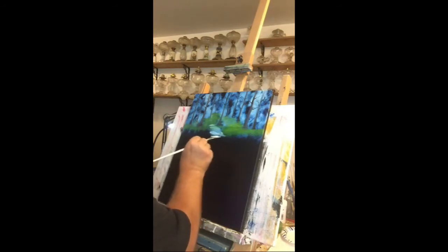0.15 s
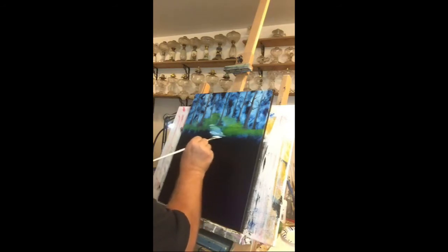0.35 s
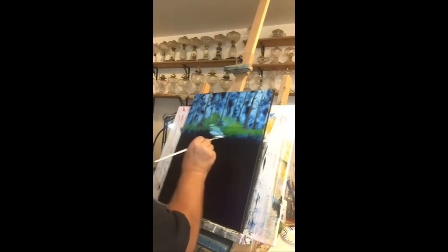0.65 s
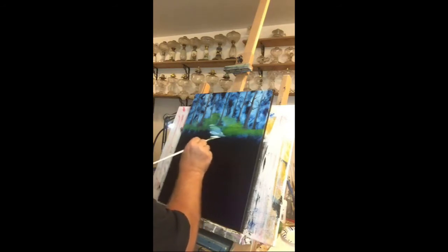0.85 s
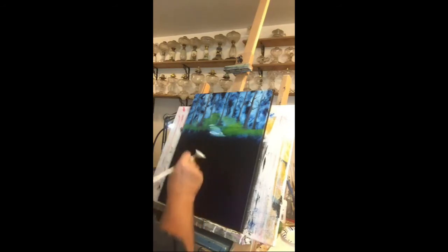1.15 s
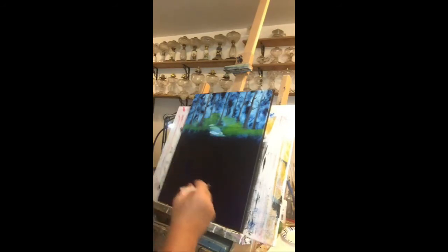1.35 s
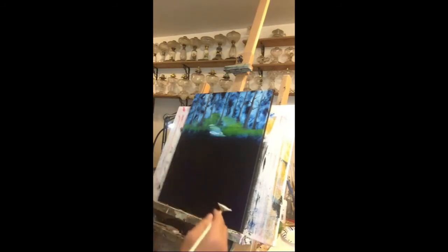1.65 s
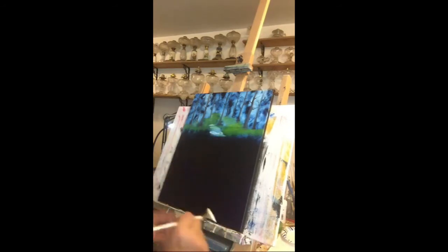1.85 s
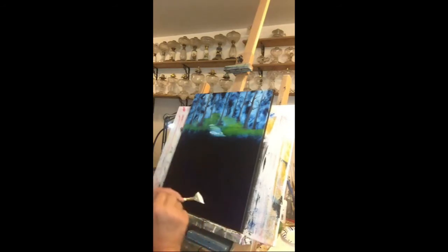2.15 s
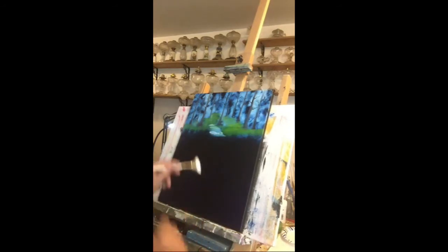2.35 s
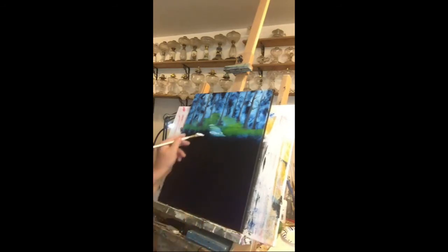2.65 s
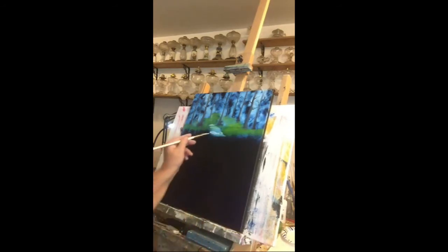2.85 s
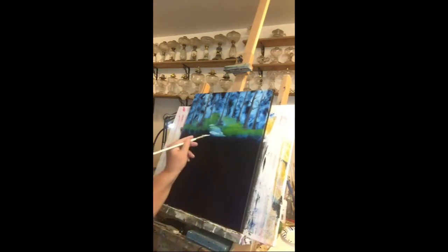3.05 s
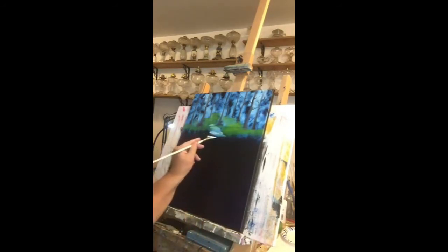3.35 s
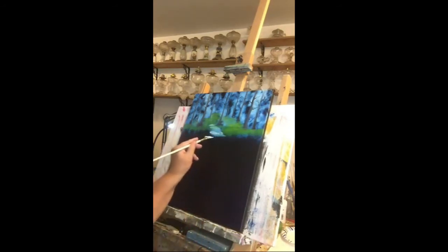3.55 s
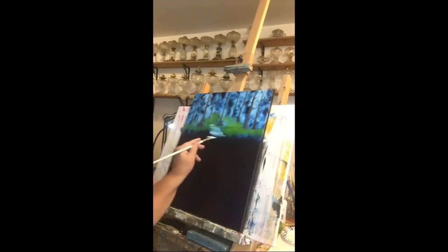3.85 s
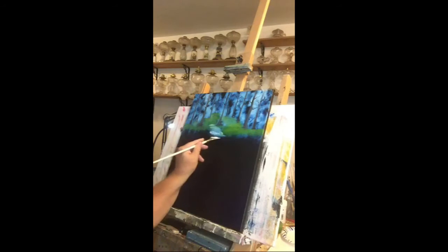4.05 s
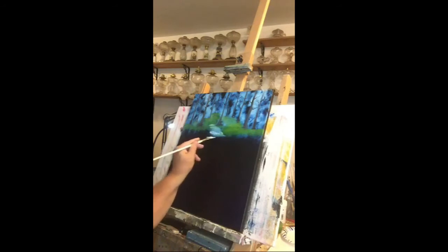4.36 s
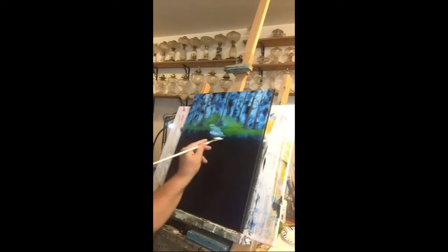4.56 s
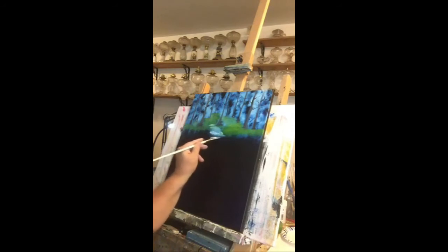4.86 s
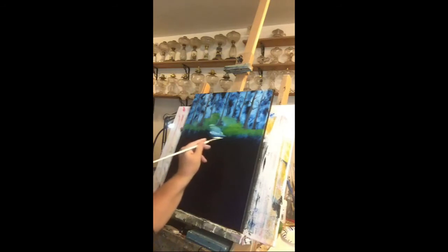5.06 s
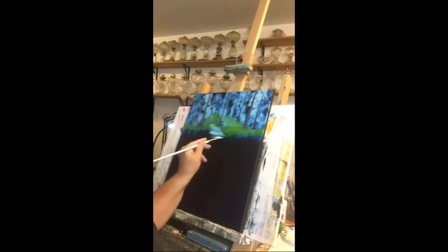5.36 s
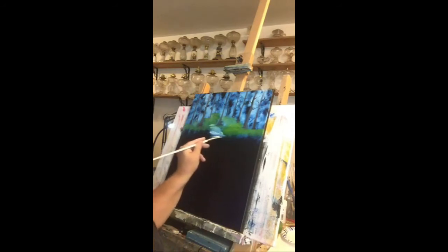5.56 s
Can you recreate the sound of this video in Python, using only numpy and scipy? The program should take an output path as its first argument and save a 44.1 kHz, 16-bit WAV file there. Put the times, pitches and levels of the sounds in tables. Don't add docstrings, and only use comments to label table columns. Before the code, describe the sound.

A close, mono, quiet pickup in a small studio. Throughout, a steady low fan hum near 120 Hz carries soft, slightly swelling air noise and faint hiss. From 0 to 0.9 s a stiff brush makes five short dry strokes on stretched canvas, roughly four per second, each a mid-high scratch with a papery, drum-like body; the fourth is strongest. At 0.94 s the handle taps the easel softly. From 1.0 to 2.4 s come very faint palette rustles, a dull tick near 1.2 s and tiny squeaks. At 2.45 s one hard wooden crack, by far the loudest event, snaps brightly with a brief metallic edge and a short room tail. Weak rustling lingers to about 3.2 s, then mostly hum. One stroke falls at 3.6 s, a faint touch at 3.9 s, and from 4.0 s to the end at 5.7 s irregular quick scrubs continue, firm ones mixed with light dabs.

```python
import sys
import numpy as np
from scipy import signal
from scipy.fft import rfft, irfft, next_fast_len
from scipy.io import wavfile
from scipy.ndimage import uniform_filter1d

SR = 44100
rng = np.random.default_rng(int(sys.argv[2]) if len(sys.argv) > 2 else 0)


def wav_record(signal):
    frames = np.transpose(np.atleast_2d(signal))
    bounded = np.clip(frames, -1, 1)
    quanta = np.round(bounded * 32767).astype(np.int16)
    wavfile.write(sys.argv[1], SR, quanta)


def elevation(decibels):
    levels = np.asarray(decibels, float)
    return 10 ** (levels / 20)


N = 251811

# landing, hardest point and lifting in
# seconds, pressure in dB, brightness in dB.
STROKES = [(-0.066, 0.006, 0.074, -51.5, -9), (0.112, 0.134, 0.23, -47.5, -11.5),
           (0.316, 0.426, 0.476, -48.5, -9.5), (0.544, 0.597, 0.681, -45, -8.5),
           (0.768, 0.807, 0.88, -49.5, -6.5), (3.58, 3.642, 3.751, -48.5, -11),
           (3.844, 3.902, 3.914, -60, -9.5), (4.025, 4.159, 4.199, -45.5, -10.5),
           (4.233, 4.282, 4.285, -68.5, -19), (4.34, 4.36, 4.391, -61, -10),
           (4.427, 4.544, 4.596, -45.5, -7.5), (4.671, 4.733, 4.78, -49, -7.5),
           (4.853, 4.969, 5.003, -46, -8), (5.049, 5.14, 5.202, -47, -7.5),
           (5.252, 5.264, 5.367, -49.5, -10), (5.401, 5.39, 5.462, -66.5, -10),
           (5.449, 5.477, 5.502, -53.5, -10), (5.525, 5.57, 5.587, -48, -10.5),
           (0.338, 0.36, 0.37, -59.5, -4),
    (0.517, 0.535, 0.53, -67, -14),
    (4.835, 4.87, 4.89, -75, -18),
    (5.03, 5.046, 5.085, -68, -22),
    (5.228, 5.26, 5.25, -57, -10),
    (5.305, 5.369, 5.376, -60.5, -5),
    (5.407, 5.44, 5.455, -65, -10),
]
# frequency in Hz, level in dB per Hz.
BRISTLE_SPECTRUM = [(1290, -16.5), (2200, -1), (2510, -3.5), (3530, -2), (4460, -6.5), (5300, -10.5),
                    (8440, -19.5), (10400, -24), (12400, -24), (16000, -30.5)]
# frequency in Hz, width in Hz, level in dB.
CANVAS_MODES = [(1324, 130, 12.5), (1600, 119, 15.5), (1994, 7.7, 5), (2270, 11, -3), (3040, 30, -3),
                (3450, 10, -5)]
LAND_S, LIFT_S, AWAY_DB = 0.029, 0.038, -45.5
LANDING_DB, LIFTING_DB = -9.5, -11
TOP_LOSS_DB_PER_DB, LANDING_LOSS_DB_PER_DB, UPPER_LOSS_DB_PER_DB = 0.067, 0.14, 0.083
SKIN_EVEN_DB, SKIN_GIVE_DB_PER_DB, SKIN_LEAD_MAX_DB = -51, 0.62, 12.5
ECHO_DB, ECHO_T60_S, ECHO_TOP_HZ = -13, 0.19, 4000

# start in seconds, length in seconds, level in dB, rubbed spot in Hz,
# spot level in dB.
RUBS = [(0.997, .05, -73, 3000, -15), (1.194, 0.23, -67, 2800, -16.5), (1.5, 0.094, -67.5, 4300, -6.5),
        (1.578, 0.29, -64.5, 3580, -9), (1.657, 0.39, -67, 4040, -6.5), (1.844, 0.41, -64, 3640, -13),
        (1.901, .42, -68.5, 3050, -6), (2.178, 0.12, -62.5, 4000, -11), (2.199, .16, -68.5, 3450, -6.5),
        (2.65, 0.14, -79, 5000, 3), (2.823, 0.2, -69.5, 3200, -16), (2.977, .25, -72, 3000, -28)]
# frequency in Hz, width in Hz, level in dB.
PALETTE_MODES = [(2070, 133, 2), (2330, 660, -8), (3050, 130, 4.5), (2800, 300, -2), (3486, 100, 0.5),
                 (4090, 50, -1), (4000, 830, 0.5), (4690, 440, 0), (5370, 900, -3), (8500, 3000, -1)]
# start in seconds, level in dB, frequency in Hz, width in Hz,
# length in seconds.
SQUEAKS = [(1.19, -48.5, 270, 121, 0.074), (1.198, -64.5, 8440, 451, 0.09), (1.223, -75, 7440, 81, 0.051),
           (1.322, -76, 2690, 101, 0.05), (1.504, -69.5, 4620, 900, .05), (1.497, -72, 6380, 101, 0.066),
           (1.83, -76.5, 7060, 301, 0.042), (1.884, -78.5, 8670, 201, 0.047), (1.955, -77, 6600, 401, 0.06),
           (1.945, -75, 8800, 601, 0.084), (2.043, -76.5, 5650, 201, .11), (2.133, -71.5, 5600, 151, 0.11),
           (2.138, -77, 5960, 101, 0.092), (2.15, -71, 14501, 1501, .08), (2.16, -79, 8501, 501, .06),
           (2.394, -68, 3060, 101, 0.043), (2.767, -76, 13100, 601, .07), (2.865, -73.5, 4601, 61, 0.033),
           (2.948, -72.5, 2980, 60.8, 0.06), (3.55, -72, 6300, 151, .055), (3.823, -73.5, 5190, 101, 0.11),
           (3.846, -78.5, 3620, 202, 0.063), (3.947, -81, 5150, 81, 0.1), (4.022, -59, 5110, 101, 0.089)]
FOCUS_DB_PER_OCTAVE, BOARD_HZ = 40, 2600

# time in seconds, peak in dB.
CRACK = [
    (2.446, -2),
]
# time in seconds, peak in dB.
TAP = [
    (0.94, -35.5),
]
# frequency in Hz, level in dB per Hz.
CRACK_SPECTRUM = [(100, -44), (150, -17.5), (198, -12.5), (642, -22), (999, -8), (1330, -4), (1440, -6),
                  (1890, -3), (2670, -9), (3000, -4.5), (4240, -2.5), (5450, -7), (12000, -19.5),
                  (12900, -21), (13700, -32), (15900, -37), (16400, -80)]
# frequency in Hz, level in dB per Hz.
TAP_SPECTRUM = [(120, -36), (200, -13.5), (658, -10.5), (1030, -9.5), (1630, -6.5), (2020, -12.5),
                (3380, -15.5), (4180, -42), (4910, -21.5), (5270, -32), (14000, -44.5)]
# frequency in Hz, level in dB, T60 in seconds.
EASEL_MODES = [(194, -10.5, 0.22), (1217, -9.5, 0.04), (1570, -2.5, 0.045), (2052, -3.5, 0.1),
               (3154, -2.5, 0.083), (3546, -2.5, 0.17), (4193, -4, 0.21), (4200, -4, 0.12),
               (5080, -22, 0.12), (5350, -11.5, 0.1413), (6070, -6.5, 0.18), (7900, -20, 0.15)]
# frequency in Hz, level in dB, T60 in seconds.
FERRULE_MODES = [(14062, -16, .16), (14812, -15, .15), (15562, -14, .15)]
# frequency in Hz, T60 in seconds.
STUDIO_T60 = [(150, 0.28), (400, 0.43), (1040, 0.2), (2760, 0.19), (7280, 0.1944)]

# frequency in Hz, level in dB per Hz.
AIR_SPECTRUM = [(30, -47), (65, -44.5), (85, -21), (150, -17), (238, -22), (395, -15.5), (450, -21.5),
                (678, -23.5), (1000, -19.5), (1350, -22), (1460, -23.5), (2080, -32), (2300, -46),
                (2600, -69.5)]
# frequency in Hz, width in Hz, level in dB.
HOUSING_MODES = [(187.8, 32, -58), (241.7, 42, -62), (301.3, 23, -65), (392.6, 28, -62.5), (646.3, 20, -63),
                 (695, 31, -60.5), (1316.5, 28, -62), (1666, 110, -72.5)]
# time in seconds, level in dB.
AIR_SWELL = [(0.0, -52), (0.32, -53), (0.54, -52.5), (1.43, -52.5), (1.94, -50), (2.51, -53), (3.05, -51),
             (3.4, -52.5), (3.66, -52), (3.78, -51.5), (4.04, -51), (4.53, -51), (4.72, -52), (5.71, -51.5)]
AIR_DB, HUM_HZ, HUM_DB = -48.5, 120.15, -48

# frequency in Hz, level in dB per Hz.
HISS_SPECTRUM = [(1500, -21.5), (2200, 1), (3300, -6), (5000, -7), (9750, -8), (12400, -5), (16000, -11)]
# frequency in Hz, level in dB per bin.
THRESHOLD = [(1900, -120), (2400, -90), (5000, -91), (9000, -96), (16000, -100)]
HISS_DB, LOW_CUT_HZ, EDGE_HZ, CEILING = -79.5, 60, 15900, 1.0


def brush():
    catch = slips(N, per_s=12000, spread_db=-1.0)
    hiss = patchy(coloured(catch, BRISTLE_SPECTRUM), depth_db=4, size=2048)
    top = high_pass(hiss, 2, 6000)
    upper = high_pass(hiss, 2, 3000)
    skin = evened(sum(elevation(db) * resonate(catch, hz, 3 * width_hz) for hz, width_hz, db in CANVAS_MODES))
    skin = patchy(skin, depth_db=2.5, size=2048)
    t, out = np.arange(N) / SR, np.zeros(N)
    uneven = wander(N, depth_db=0.8, size=250)
    for land_s, hardest_s, lift_s, db, bright_db in STROKES:
        press_db = stroke_pressure(t, land_s, hardest_s, lift_s, db)
        lightness_db = press_db - db
        dulling = TOP_LOSS_DB_PER_DB + LANDING_LOSS_DB_PER_DB * (t < hardest_s)
        tips = hiss + (elevation(bright_db + 15 + dulling * lightness_db) - 1) * top
        tips += (elevation(UPPER_LOSS_DB_PER_DB * lightness_db) - 1) * upper
        body_db = np.minimum(SKIN_GIVE_DB_PER_DB * (SKIN_EVEN_DB - press_db), SKIN_LEAD_MAX_DB)
        body = elevation(uniform_filter1d(body_db, size=300)) * skin
        pressure = uniform_filter1d(elevation(uniform_filter1d(press_db, size=500)), size=500)
        out += pressure * (uneven * tips + body)
    return out


def stroke_pressure(t, land_s, hardest_s, lift_s, db):
    times_s = np.sort([land_s - LAND_S, land_s, hardest_s, lift_s, lift_s + LIFT_S])
    levels_db = [AWAY_DB, LANDING_DB, 0, LIFTING_DB, AWAY_DB]
    return db + np.interp(t, times_s, levels_db, 2 * AWAY_DB, 2 * AWAY_DB)


def slips(count, per_s, spread_db):
    chance, sign, size = rng.random(count), rng.standard_normal(count), rng.exponential(1, count)
    return evened((chance < per_s / SR) * sign * elevation(spread_db * np.minimum(size, 4)))


def echo(x):
    t = np.arange(SR // 4) / SR
    b, a = signal.butter(2, ECHO_TOP_HZ, fs=SR)
    tail = signal.lfilter(b, a, rng.standard_normal(len(t))) * elevation(-60 * t / ECHO_T60_S)
    return elevation(ECHO_DB) * signal.oaconvolve(x, tail / np.linalg.norm(tail))[:len(x)]


def knock(db, spectrum, ring_db, pace, rise_s):
    t = np.arange(SR // 2) / SR
    burst = coloured(slips(len(t), per_s=18000, spread_db=1), spectrum)
    hz, frame_s, z = signal.stft(burst, SR, nperseg=128)
    decay = elevation(-60 * frame_s / (pace * read(STUDIO_T60, hz)[:, None]))
    tail = signal.istft(z * decay, SR, nperseg=128)[1][:len(t)]
    tail += elevation(-35.5 - 60 * t / 0.62) * burst
    rings = np.zeros(len(t))
    for mode_hz, mode_db, t60_s in EASEL_MODES + FERRULE_MODES:
        phase = 2 * np.pi * rng.random()
        rings += elevation(mode_db - 60 * t / (pace * t60_s)) * np.sin(2 * np.pi * mode_hz * t + phase)
    blow = elevation(db) * (tail + elevation(ring_db) * rings) * np.minimum(t / rise_s, 1) ** 2
    return high_pass(blow, 4, 130)


def rustle():
    out = np.zeros(N)
    for s, length_s, level_db, spot_hz, spot_db in RUBS:
        count = round(length_s * SR)
        for hz, width_hz, db in PALETTE_MODES:
            near_db = (hz > BOARD_HZ) * (spot_db - FOCUS_DB_PER_OCTAVE * abs(np.log2(hz / spot_hz)))
            contact = wander(SR // 2, depth_db=3, size=1000)
            rub = contact * resonate(slips(SR // 2, per_s=1500, spread_db=-1.5), hz, width_hz)
            add(out, s, elevation(level_db + db + near_db) * rub[:count] * signal.windows.tukey(count, 0.6))
    return out


def squeaks():
    out = np.zeros(N)
    for s, db, hz, width_hz, length_s in SQUEAKS:
        puff = resonate(rng.standard_normal(5000), hz, width_hz)[:round(length_s * SR)]
        add(out, s, elevation(db) * puff * np.hanning(len(puff)))
    return out


def fan():
    t = np.arange(N) / SR
    hum = np.sqrt(2) * elevation(HUM_DB) * wander(N, depth_db=0.07, size=4000) * np.sin(2 * np.pi * HUM_HZ * t)
    air = elevation(AIR_DB - 4.5) * patchy(coloured(rng.standard_normal(N), AIR_SPECTRUM), depth_db=2.5, size=2048)
    for hz, width_hz, db in HOUSING_MODES:
        ringing = resonate(rng.standard_normal(N), hz, width_hz)
        air += elevation(db) * wander(N, depth_db=2.5, size=6000) * ringing
    swell_db = np.interp(t, *np.transpose(AIR_SWELL))
    return hum + air * elevation(swell_db - swell_db.mean())


def evened(x):
    return x / np.sqrt(np.mean(x ** 2) + 1e-20)


def read(points, hz):
    f, value = np.transpose(points)
    return np.interp(np.log(hz + 1), np.log(f + 1), value)


def add(mix, s, sound):
    part = mix[round(s * SR):][:len(sound)]
    part += sound[:len(part)]


def high_pass(x, order, hz):
    return signal.sosfilt(signal.butter(order, hz, "high", fs=SR, output="sos"), x)


def coloured(x, points):
    size = next_fast_len(len(x))
    gain = elevation(read(points, np.fft.rfftfreq(size, 1 / SR)))
    return evened(irfft(rfft(x, size) * gain, size)[:len(x)])


def resonate(x, hz, width_hz):
    r = np.exp(-np.pi * width_hz / SR)
    poles = [1, -2 * r * np.cos(2 * np.pi * hz / SR), r * r]
    return evened(signal.lfilter([1], poles, signal.lfilter([1], poles, x)))


def patchy(x, depth_db, size):
    z = signal.stft(x, nperseg=size)[2]
    patches = uniform_filter1d(rng.standard_normal(z.shape), size=3, axis=0)
    patches = uniform_filter1d(patches, size=5, axis=1)
    return evened(signal.istft(z * elevation(depth_db * evened(patches)), nperseg=size)[1][:len(x)])


def wander(count, depth_db, size):
    drift = uniform_filter1d(uniform_filter1d(rng.standard_normal(count), size), size)
    return elevation(depth_db * evened(drift))


def scene():
    strokes = brush()
    out = strokes + echo(strokes) + rustle() + squeaks() + fan()
    crack_s, crack_db = CRACK[0]
    tap_s, tap_db = TAP[0]
    crack_spectrum = CRACK_SPECTRUM
    add(out, crack_s - 0.001, knock(crack_db - 9, crack_spectrum, ring_db=-6.0, pace=0.89, rise_s=0.00038))
    add(out, tap_s - 0.001, knock(tap_db - 2, TAP_SPECTRUM, ring_db=-23, pace=0.7, rise_s=0.0029))
    return out[None]


def roll_off(x):
    return signal.sosfilt(signal.butter(12, 16650, fs=SR, output="sos"), x)


def record(dry):
    heard = high_pass(dry, 2, LOW_CUT_HZ)
    hz, t, z = signal.stft(heard, SR, nperseg=1536)
    power = uniform_filter1d(abs(z) ** 2, size=3, axis=1)
    threshold_power = elevation(2 * read(THRESHOLD, hz)[:, None])
    keep = np.clip(1 - threshold_power / (power + 1e-20), 0.003, 1)
    for frame in range(1, len(t)):
        keep[..., frame] = np.maximum(keep[..., frame], 0.72 * keep[..., frame - 1])
    smear = elevation(-33) * (rng.standard_normal(z.shape) + 1j * rng.standard_normal(z.shape))
    x = signal.istft(z * keep * (1 + smear), SR, nperseg=1536)[1][:, :N]
    x = CEILING * np.tanh(x / CEILING)
    loud = uniform_filter1d(abs(x), size=2000) > 0.05
    x -= uniform_filter1d(uniform_filter1d(x * loud, size=400), size=400)
    x += elevation(HISS_DB) * coloured(rng.standard_normal(N), HISS_SPECTRUM)
    x = signal.oaconvolve(x, signal.firwin(511, EDGE_HZ, fs=SR)[None], "same")
    return roll_off(x)


dry = scene()
out = record(dry)
wav_record(out)
```